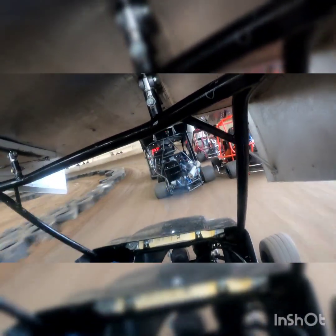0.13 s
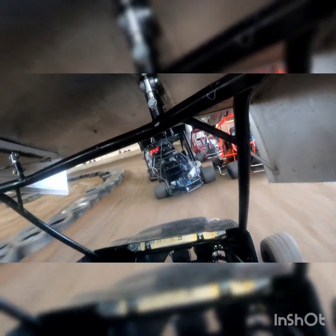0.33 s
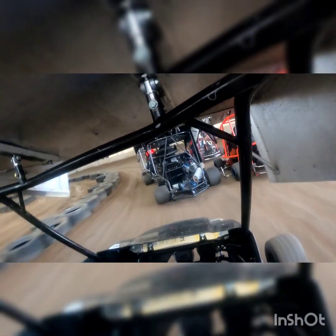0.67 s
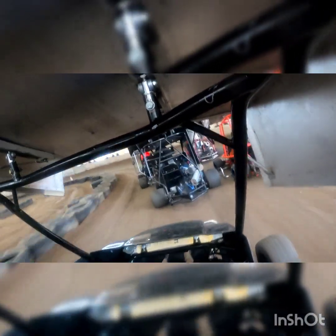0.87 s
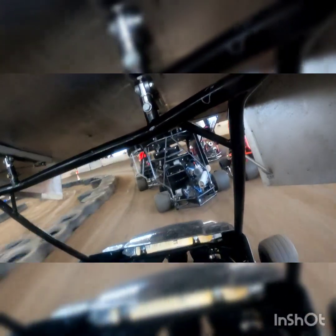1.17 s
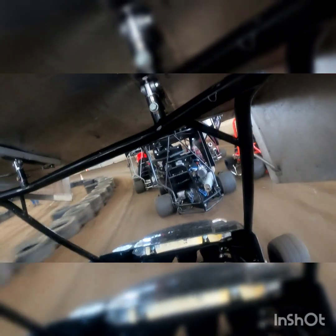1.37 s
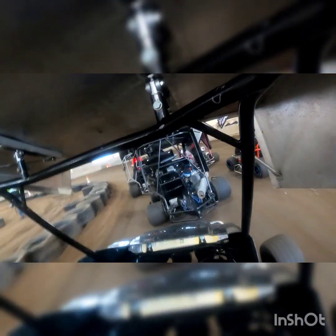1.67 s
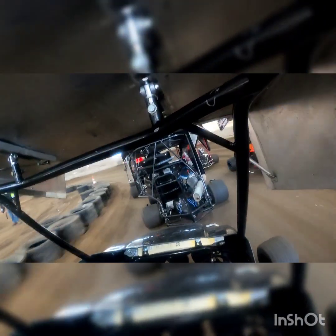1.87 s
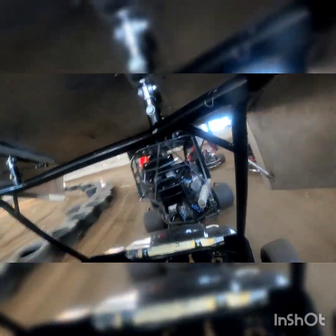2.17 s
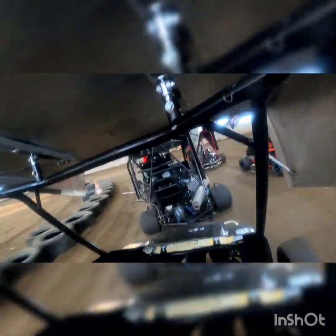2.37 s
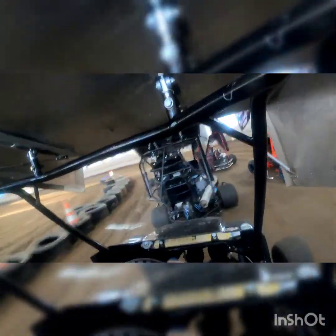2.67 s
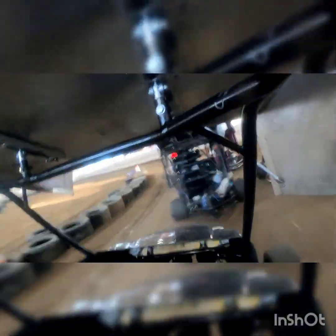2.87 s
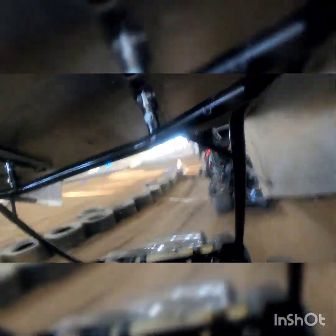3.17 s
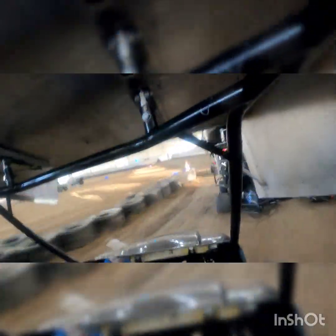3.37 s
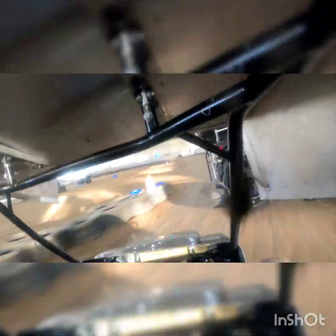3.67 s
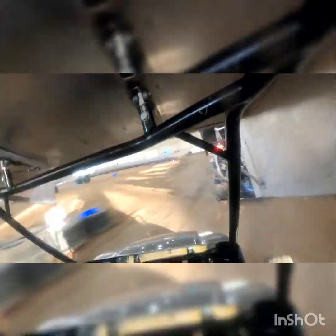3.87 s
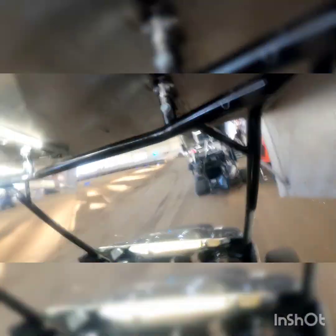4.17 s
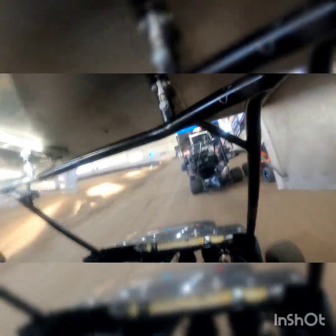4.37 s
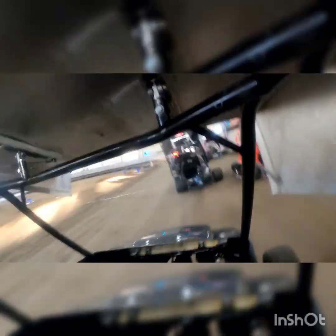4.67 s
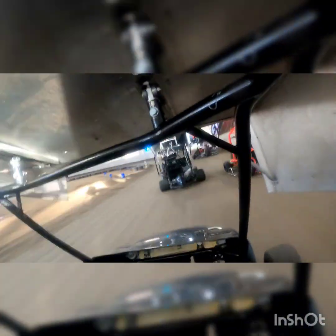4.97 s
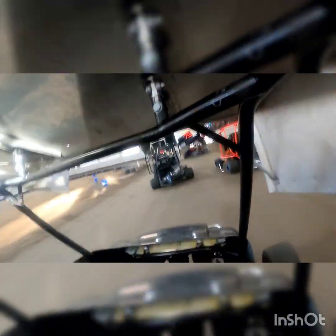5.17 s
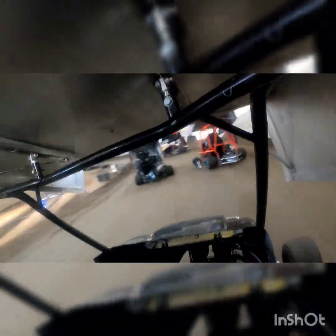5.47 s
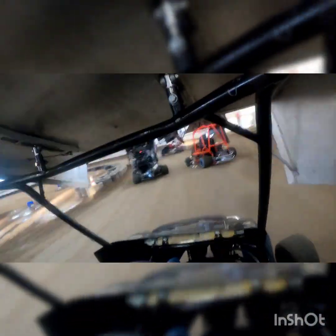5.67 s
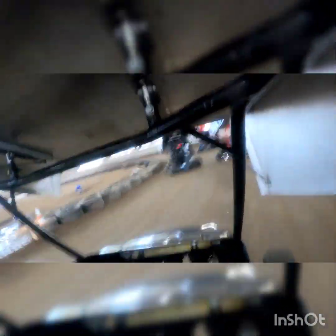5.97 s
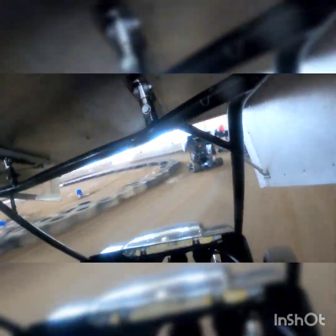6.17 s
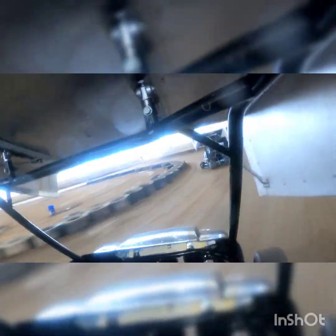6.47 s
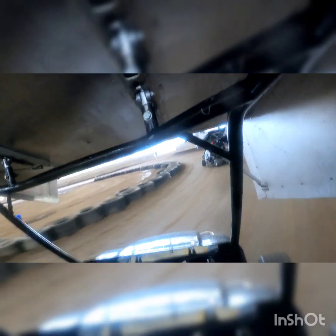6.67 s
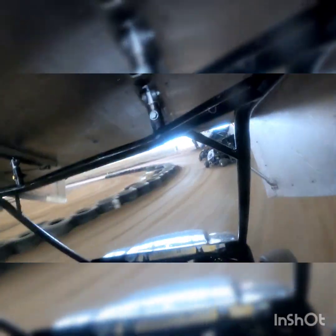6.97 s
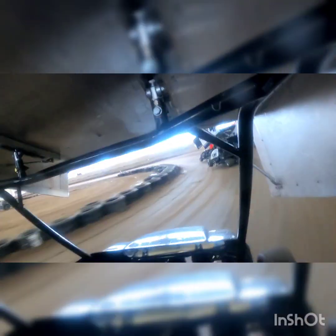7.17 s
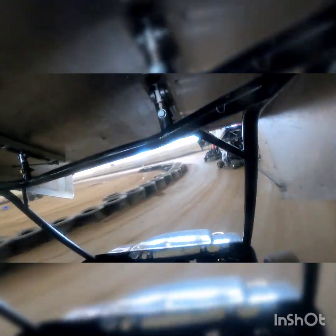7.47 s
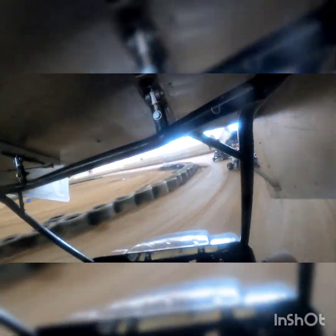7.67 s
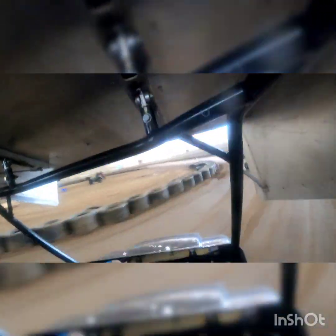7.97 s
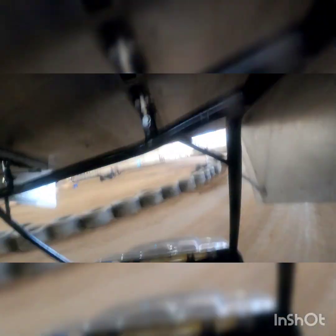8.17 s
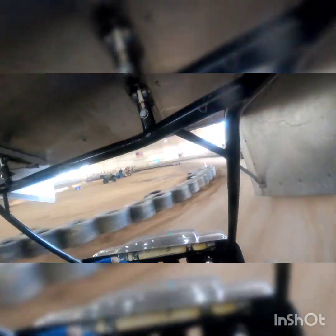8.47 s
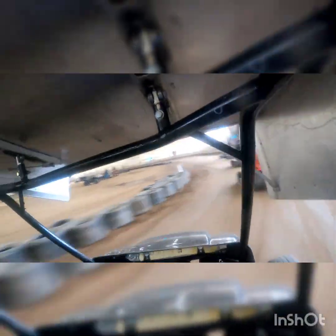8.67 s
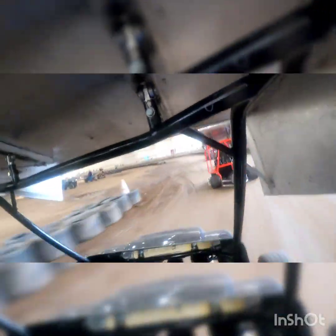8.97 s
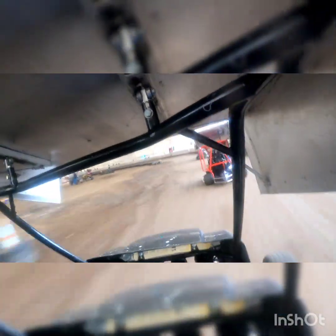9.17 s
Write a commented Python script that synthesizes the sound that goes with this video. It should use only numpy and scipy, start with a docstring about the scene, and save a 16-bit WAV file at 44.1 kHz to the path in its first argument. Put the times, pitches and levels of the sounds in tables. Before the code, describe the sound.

A small single-cylinder racing kart engine blips and drones low at close range, with rattling bodywork, drumming cage tubes and a pack roaring around it.

```python
"""On the cage of a racing kart on a dirt oval, heard through the two microphone ports of a camera bolted there.
The single-cylinder engine blips up and down as a stack of sine orders; ruts swell a sine bending note of the frame.
Resonated noise drums four cage notes; coloured noise and short rings make the rattle of panels and chain.
Brief noise bursts tick on the cage, and low noise is the roar of the pack. A limiter ducks the peaks."""
import sys
import numpy as np
from scipy import signal
from scipy.fft import rfft, irfft, next_fast_len
from scipy.io import wavfile
from scipy.ndimage import uniform_filter1d, minimum_filter1d, map_coordinates

SR = 44100
rng = np.random.default_rng(int(sys.argv[2]) if len(sys.argv) > 2 else 0)


def generate_wav(sig):
    """Save sig (samples, or channels by samples) to the path in sys.argv[1] as 16-bit PCM at SR."""
    pcm = np.round(np.clip(np.atleast_2d(sig).T, -1, 1) * 32767).astype(np.int16)
    wavfile.write(sys.argv[1], SR, pcm)


N = 410998
TIME = np.arange(N) / SR

# phase by which the left port leads the right: (frequency [Hz], phase [rad])
PORT_LEAD = [(50, .08), (150, 0), (205, -.22), (280, -.5), (520, -1.0), (1030, .5), (1460, -.6), (1980, .4),
             (2410, 1.5), (3450, .5), (4570, 3.8), (5600, 3.3), (6290, 3.3), (7000, 0), (7750, 1)]
# strength of the left port against the right: (frequency [Hz], difference [dB])
PORT_TILT = [(40, -2.2), (70, -1.2), (120, -1.5), (200, -.5), (280, -1.3), (400, -1.3)]


def amp(db):
    """Gain of a level in dB."""
    return 10 ** (np.asarray(db) / 20)


def unit(x):
    """Scaled to rms 1."""
    return x / np.sqrt(np.mean(x ** 2) + 1e-20)


def along(points, hz):
    """Values at hz, read from (Hz, value) points on a log frequency axis."""
    f, v = np.transpose(points)
    return np.interp(np.log(hz + 1), np.log(f + 1), v)


def curves(rows):
    """One value per sample for each column after the time."""
    s, *cols = np.transpose(rows)
    return [np.interp(TIME, s, c) for c in cols]


def wobble(rate):
    """A smooth random curve, rate knots a second."""
    knots = rng.standard_normal(int(N * rate / SR) + 4)
    return map_coordinates(knots, [TIME * rate])


def filtered(x, response):
    """x shaped by a complex response of frequency, padded so that its ring does not wrap round."""
    m = next_fast_len(N + SR // 4)
    hz = np.fft.rfftfreq(m, 1 / SR)
    return irfft(rfft(x, m) * response(hz), m)[..., :N]


def turns(hz):
    """Phase in radians of a running rate."""
    return 2 * np.pi * np.cumsum(hz) / SR


def tone(phase, db):
    """A sine of given rms level, from a random starting phase."""
    return np.sqrt(2) * amp(db) * np.sin(phase + rng.uniform(0, 2 * np.pi))


def ports(pair, left_db, right_db):
    """Two unrelated signals mixed, coloured and phase-shifted as the two microphone ports pick them up."""
    # likeness of the two ports: (frequency [Hz], coherence [0-1])
    likeness = [(60, .99), (200, .97), (290, .92), (370, .5), (500, .4), (800, .5), (1200, .93), (1430, .7),
                (1700, .93), (2400, .7), (3300, .7), (4600, .7), (6400, .4), (12000, .3)]

    def response(hz):
        # the ports share the first signal and take the second in opposite signs
        u = np.arccos(np.clip(along(likeness, hz), 0, 1)) / 2
        lead = np.exp(.5j * along(PORT_LEAD, hz))
        left, right = amp(left_db(hz)) * lead, amp(right_db(hz)) / lead
        return np.array([[left * np.cos(u), left * np.sin(u)],
                         [right * np.cos(u), -right * np.sin(u)]])
    return filtered(pair, response).sum(axis=1)


def engine():
    """Exhaust orders, sines at multiples of the crank rate with uneven firing; also returns the crank phase."""
    # engine in three stretches: (time [s], crank rate [Hz], then the mean level [dB] of each main order)
    stretches = [
        [(0.0, 56, -21, -21.5, -17.5, -30.5), (0.05, 60.55, -18, -30.5, -25.5, -28.5),
         (0.27, 70.2, -26, -34.5, -20.5, -20), (0.45, 79.9, -20.5, -27, -18, -23.5),
         (0.55, 69.5, -21.5, -34.5, -31, -12.5), (0.6, 63.8, -25.5, -18, -14.5, -27),
         (0.62, 60.5, -12.5, -31.5, -33, -23), (0.65, 60.5, -14, -25, -18.5, -25),
         (0.74, 57.45, -15, -28, -35, -22.5), (0.86, 63.3, -20, -31, -27.5, -36),
         (0.91, 67.37, -23, -25, -30.5, -18.5), (1.06, 87.9, -27.5, -27, -18, -28.5),
         (1.16, 80.7, -14, -25, -14, -30), (1.24, 67.9, -24.5, -31.5, -23.5, -24.5),
         (1.36, 61.4, -21, -37, -34, -24), (1.52, 59.2, -22.5, -30.5, -24, -34),
         (1.64, 61.4, -24, -33, -25.5, -26), (1.69, 61.53, -21.5, -20.5, -20.5, -32),
         (1.8, 78.36, -19, -30.5, -25.5, -22), (1.91, 87.7, -20, -33, -13, -39),
         (2.01, 74.2, -23.5, -34, -19.5, -24), (2.15, 71.04, -19, -32, -19, -18),
         (2.24, 60.93, -24, -22.5, -31.5, -26.5), (2.28, 60.46, -19, -38, -25, -35),
         (2.35, 63.9, -22, -30, -28, -20.5), (2.39, 67.3, -23.5, -39.5, -32, -23),
         (2.53, 107.5, -37.5, -30, -20.5, -31), (2.65, 101.9, -20.5, -28.5, -11, -35),
         (2.82, 87.15, -25, -29, -20, -34), (2.93, 91.2, -32, -39, -27, -25),
         (3.05, 89.7, -13.5, -32, -18, -28), (3.1, 95.8, -18, -29.5, -20.5, -27.5)],
        [(3.14, 112.1, -14, -29, -20.5, -33), (3.26, 129.9, -24.5, -32.5, -25.5, -42),
         (3.41, 102.3, -22, -15.5, -30, -26), (3.46, 106.7, -20.5, -38, -10, -38),
         (3.57, 125, -14.5, -28, -27.5, -43), (3.69, 110, -23.5, -22, -28.5, -37),
         (3.75, 107.4, -18, -31, -13.5, -35), (3.86, 132.8, -14.5, -25, -29.5, -38),
         (3.93, 155.8, -28, -19.5, -35, -32), (4.0, 116.3, -14.5, -31, -20.5, -49),
         (4.03, 115.1, -23.5, -17.5, -29, -34), (4.1, 118.7, -14, -27, -26, -36),
         (4.16, 124.9, -11, -42, -42, -45), (4.2, 126.4, -17.5, -19, -38, -35),
         (4.28, 102.4, -14.5, -25, -18, -39), (4.49, 125.5, -28, -20, -27, -38),
         (4.62, 114.9, -10.5, -30, -16.5, -49), (4.71, 125.8, -22, -22.5, -32, -42),
         (4.89, 115.7, -18, -29.5, -27, -29), (4.91, 115.4, -20.5, -23, -28, -49),
         (5.06, 145.2, -20.5, -18, -33.5, -32.5), (5.13, 104.1, -24, -29, -24, -39),
         (5.23, 105.9, -23, -25.5, -19.5, -37), (5.33, 96.35, -20.5, -31, -19, -24),
         (5.46, 106.6, -27.5, -23, -14, -38.5), (5.58, 86.5, -17, -30, -23.5, -24.5),
         (5.75, 59.54, -23, -27.5, -27.5, -25), (5.85, 86.6, -30.5, -30.5, -27.5, -33.5),
         (5.92, 104.5, -19, -23.5, -22, -37), (6.0, 122.8, -26, -22.5, -37, -35),
         (6.12, 100.6, -29, -27, -20, -32.5), (6.2, 115.4, -23.5, -21, -23.5, -40)],
        [(6.24, 115.3, -17.5, -16, -24, -35), (6.26, 118.7, -8, -30, -28, -41),
         (6.36, 102.9, -29, -30.5, -27, -33), (6.44, 104.5, -10, -23, -15.5, -34),
         (6.55, 113, -10.5, -28, -21.5, -21), (6.64, 100.6, -15, -26, -16.5, -36),
         (6.75, 86.7, -33, -32.5, -20.5, -29), (6.82, 97.9, -16.5, -25.5, -21, -23.5),
         (6.89, 120.9, -13.5, -23.5, -24.5, -46), (6.92, 129.8, -14, -15, -26, -29),
         (6.97, 126.5, -17.5, -26, -24.5, -38), (7.18, 102, -16.5, -27.5, -20, -33),
         (7.22, 99.1, -19.5, -27.5, -16.5, -42), (7.39, 98.9, -25, -27.5, -21.5, -31),
         (7.47, 89.7, -22.5, -26.5, -28.5, -31.5), (7.52, 88.5, -21.5, -33, -16.5, -22.5),
         (7.62, 105.1, -13.5, -23, -14.5, -30), (7.7, 117.1, -11, -30, -40.5, -36),
         (7.74, 123.7, -14, -30, -28, -39), (7.99, 127.9, -23, -28, -17.5, -44),
         (8.07, 145.6, -23, -24, -23.5, -37), (8.21, 116.5, -17, -14, -33, -26),
         (8.32, 119.6, -24.5, -32.5, -20.5, -39), (8.43, 140.4, -18.5, -27, -27, -41),
         (8.57, 152.3, -22.5, -33, -18.5, -39), (8.73, 142.4, -12.5, -35, -32.5, -40),
         (8.82, 152.5, -19.5, -26, -35, -38), (8.92, 131.1, -20, -19, -25, -41),
         (9.03, 156, -14.5, -42, -21, -30), (9.15, 134.5, -8.5, -26.5, -30.5, -42),
         (9.24, 141.1, -17.5, -22, -25, -34), (9.32, 154.2, -23.5, -23.5, -30, -34)],
    ]
    # main orders that have a level column: (multiple of the crank rate)
    main_orders = [1, 1.5, 2, 3]
    # weak exhaust orders: (multiple of the crank rate, mean level [dB])
    weak_orders = [(4, -43), (5, -43)]
    flutter_db, drift_db = 2.2, .5  # fast and slow wavering of each main order

    hz, *order_db = curves(np.concatenate(stretches))
    crank = turns(hz * (1 + .004 * wobble(14) + .006 * wobble(35)))
    exhaust = 0
    for k, db in zip(main_orders, order_db):
        exhaust = exhaust + tone(k * crank, db + flutter_db * wobble(20) + drift_db * wobble(5.9))
    for k, db in weak_orders:
        exhaust = exhaust + tone(k * crank, db + 4 * wobble(8))
    return exhaust, crank


def sway():
    """The frame's lightly damped bending note, a sine that ruts swell, hold and let die."""
    # swells of the frame note: (time it reaches full level [s], time held there [s], level [dB], pitch [Hz])
    swells = [(0.0, 0.13, -17.5, 42.5), (0.201, 0.39, -18, 41.82), (0.552, 1, -16.5, 42.65),
              (1.656, 0.085, -9.5, 44.65), (1.897, 0.17, -19.5, 46.6), (2.201, 0.34, -13.5, 45.15),
              (2.761, 0.19, -14, 41.1), (3.099, 0.41, -14, 38.38), (3.8, 0.11, -18, 40.79),
              (4.061, 0.33, -17.5, 41), (4.439, .5, -17.5, 40.84), (5.116, 0.037, -16.5, 41.98),
              (5.262, 0.037, -12.5, 42), (5.637, 0.47, -15, 40.96), (6.35, .08, -13.5, 45.05),
              (6.627, 0.42, -20, 42.9), (7.086, 0.14, -17, 41.02), (7.3, 0.19, -12.5, 40.5),
              (7.852, 0.079, -11.5, 43.74), (8.25, 0.11, -11, 40.6), (8.863, .05, -16, 46.5)]
    rise_db_per_s, fade_db_per_s = 250, 150.5  # how fast the note swells and dies

    full_at, hold, db, hz = np.transpose(swells)[..., None]
    rise_db = rise_db_per_s * (TIME - full_at)
    die_db = fade_db_per_s * (full_at + hold - TIME)
    shape_db = np.minimum(0, np.minimum(rise_db, die_db))
    # the pitch glides from the middle of one hold to the next
    pitch_hz = np.interp(TIME, (full_at + hold / 2)[:, 0], hz[:, 0]) + 1.213 * wobble(8)
    # the loudest swell rules at each moment
    level_db = (db + shape_db).max(axis=0) + 0.7 * wobble(25) + 2.0 * wobble(6.3)
    return tone(turns(pitch_hz), level_db)


def drum():
    """Four cage notes, resonances rung by noise as the frame shakes, each swelling at its own moments."""
    # drum notes of the tube cage: (centre [Hz], resonance width [Hz])
    modes = [(213.66, 13.2), (184.9, 12), (287.9, 27), (123, 11)]
    # mean level of each note before the shared drumming curve: (level [dB])
    mode_db = [-23, -25, -31.5, -29]
    # how hard the cage drums: (time [s], gain [dB])
    drumming = [(0, 1.5), (1.3, 2), (2.3, 4.5), (3.3, -2.5), (4.6, -3.5), (5.3, -1), (6.6, -2.5), (8, -3),
                (9.32, -2)]

    sound = 0
    for (c, w), db in zip(modes, mode_db):
        # two equal resonators in a row
        mode = lambda f: (1j * f * w / (c * c - f * f + 1j * f * w)) ** 2
        note = unit(filtered(rng.standard_normal(N), mode))
        sound = sound + amp(db + 1.3 * wobble(3)) * note
    return sound * amp(curves(drumming)[0])


def rattle(crank, swing):
    """Dense metal contacts, bunched by firings, by the frame's swing and at random, ringing the panels."""
    # shaking of the bodywork: (time [s], rattle level [dB], treble against it [dB], fizz against it [dB])
    shaking = [(0, -22.5, -2.5, -13), (.7, -22.5, -4, -13), (1.3, -22, -5, -14.5), (1.9, -22, -5, -12.5),
               (2.5, -22, -3, -12.5), (3, -22, -2.5, -13), (3.33, -21.5, 1, -13.5), (4, -22.5, 1.5, -12),
               (4.6, -21.5, -1, -13), (5, -22.5, -1, -14), (5.5, -21.5, -2.5, -15.5), (6, -22, -1.5, -15.5),
               (6.4, -22.5, 0, -14), (7.3, -22.5, -1, -13.5), (8, -22.5, 2.5, -11.5), (8.6, -21.5, 1, -13),
               (9.32, -21, -0.5, -13.5)]
    # mount and case colour: (frequency [Hz], relative density [dB per Hz])
    case_colour = [(200, -30), (330, -10), (700, -10), (1500, -9), (2300, -13), (2900, -23), (4000, -28),
                   (5600, -28), (6100, -36), (7800, -47), (8300, -61), (12500, -62), (14000, -72),
                   (15500, -85)]
    # panel resonances: (centre [Hz], half-width [Hz], left boost [dB], right boost [dB])
    panels = [(446, 55, 3, 11), (521, 44, 9, -3), (627, 34, -4.5, 1), (746, 60, 1.5, 5), (1084, 68, 2, 1.5),
              (1188, 45, 1.5, 8.5), (1330, 130, -3.5, -3.5), (1608, 64, 1, 3.5), (1760, 110, 0.5, 3),
              (2210, 600, -3, 0.5), (2497, 37, -1.5, 6), (2813, 64, -8.5, -7.5), (3070, 140, 0.5, 6.5),
              (3780, 110, -4.5, 2), (4370, 360, -2, 6), (4695, 320, 7.5, 1), (5380, 260, 2.5, -15.5),
              (8400, 1200, -9.5, 5), (10200, 1100, 5.5, 3)]
    # the rattle dips for an instant: (time [s], half-length to 1/e of the depth [s], depth [dB])
    dips = [(5.813, .006, -5), (5.987, .0015, -6), (6.022, .0015, -6), (4.263, .002, -6), (4.298, .002, -7),
            (4.751, .002, -7), (5.973, .002, -9), (6.0, .002, -8), (6.027, .002, -6), (6.037, .0025, -11),
            (6.053, .002, -8), (6.062, .003, -13), (4.145, .003, -6), (4.25, .003, -6)]
    firing_db, swing_db = .9, 1.6  # how much each firing (rms) and each swing (at most) bunch the rattle

    body_db, bright_db, fizz_db = curves(shaking)
    low_db = -6.5 - 0.6 * bright_db  # the low rattle thins as the treble grows
    pan_db = 1.4 - 0.24 * bright_db  # the treble draws the rattle to the right

    # loose parts strike at both ends of the swing
    swing_power = unit(swing) ** 2
    ends = swing_power - uniform_filter1d(swing_power, size=SR // 40)
    firings = unit(np.exp(1.5 * np.cos(crank)) - np.i0(1.5))  # one peak a crank turn
    bunch_db = firing_db * firings + swing_db * np.tanh(ends / 2)
    random_db = 0.66 * wobble(45) + 1.02 * wobble(170)
    contacts = amp(bunch_db + random_db) * rng.standard_normal((2, N))
    contacts[0] += amp(-16.5) * strands(crank, count=1100)

    def side_db(column):
        """Case colour plus the panel peaks of one side."""
        peaks = lambda hz: sum(p[column] / (1 + ((hz - p[0]) / p[1]) ** 2) for p in panels)
        return lambda hz: along(case_colour, hz) + peaks(hz)

    sound = ports(patchy(contacts), side_db(2), side_db(3))
    above = lambda edge_hz: filtered(sound, lambda hz: 1 / (1 + (edge_hz / (hz + 1)) ** 6))
    # four bands, split at 680, 1500 and 3800 Hz
    cuts = [sound, above(680), above(1500), above(3800), 0]
    low, body, bright, fizz = (unit(a - b) for a, b in zip(cuts, cuts[1:]))

    # jolts shake the light parts more than the heavy ones
    jolt = 0.19 * wobble(8.2) + .7 * wobble(22)
    parts = amp(low_db + 0.66 * wobble(14)) * low
    parts = parts + amp(0.8 + 0.14 * jolt) * body
    parts = parts + amp(bright_db + 0.77 * jolt + 0.58 * wobble(10)) * bright
    parts = parts + amp(fizz_db + 0.47 * jolt + 1.1 * wobble(13)) * fizz
    dip_db = sum(db * np.exp(-((TIME - s) / length) ** 4) for s, length, db in dips)
    return amp(body_db + dip_db + np.array([[.5], [-.5]]) * pan_db) * parts


def strands(crank, count):
    """Panels caught ringing for 41 to 89 ms, at pitches near their resonances, bending with the revs."""
    spread_hz = 110  # full width of the pitch scatter
    follows = .15  # phase bend per unit of engine glide; the pitch bends twice as far

    draw, t = rng.random((count, 5)), np.arange(SR // 8) / SR
    panel_hz = np.array([790, 1070, 1180, 1590, 1750, 450, 540, 2500, 3100, 4720, 4950, 7170])
    hz = panel_hz[(draw[:, 0] * 12).astype(int)] + spread_hz * (draw[:, 1] - .5)
    start = (draw[:, 4:5] * N).astype(int)
    log_revs = np.log(uniform_filter1d(np.gradient(crank), size=SR // 15))
    glide = np.gradient(log_revs)[start] * SR  # relative change of the revs a second
    bend = (0.29 * (draw[:, 2:3] - .5) + follows * glide) * t
    life_s = 0.041 + 0.048 * draw[:, 3:4]
    swell = np.sin(np.pi * np.clip(t / life_s, 0, 1)) ** 2
    rings = np.sin(2 * np.pi * hz[:, None] * t * (1 + bend)) * swell
    # lay every ring down at its own start
    at = start + np.arange(len(t))
    return unit(np.bincount(at.ravel(), rings.ravel(), N + len(t))[:N])


def patchy(x):
    """Each region of the spectrum swells at its own moments, by a smoothed random field of gains."""
    # how strongly each region swells: (frequency [Hz], rms depth [dB])
    patch_depth = [(400, 0.8), (1500, 0.4), (3000, 1.48), (8000, 0.9)]

    hz, _, z = signal.stft(x, SR, nperseg=512)
    field = rng.standard_normal(z.shape[1:])
    for axis in (0, 1):
        field = uniform_filter1d(field, size=6, axis=axis)
    gain = amp(along(patch_depth, hz)[:, None] * unit(field))
    return signal.istft(z * gain, nperseg=512)[1][:, :N]


def ticks():
    """Loose parts tick on the cage: each is a few milliseconds of bright noise; many faint ones fall at random."""
    # clear ticks: (time [s], starting level before the colour [dB])
    clear_ticks = [(0.7921, -21), (1.396, -24), (1.7168, -23), (4.1025, -13), (4.293, -19), (4.5605, -14),
                   (4.6245, -14), (4.757, -21), (5.9445, -15), (5.99, -18)]
    # colour of a tick: (frequency [Hz], gain [dB])
    tick_colour = [(500, -14), (1200, -3), (3000, 0), (5500, -1), (7800, -13), (8400, -34), (13500, -35),
                   (15500, -46)]
    t60_s = .009  # time to fall by 60 dB
    faint_db, faint_spread_db = -33, 6  # lowest level of the faint ticks, and their range above it

    sound, t = np.zeros((2, N + SR)), np.arange(SR // 50) / SR
    faint_ticks = rng.random((150, 2)) * [N / SR, faint_spread_db] + [0, faint_db]
    for s, db in [*clear_ticks, *faint_ticks]:
        # partly the same noise at both ports
        noise = rng.standard_normal(len(t)) + .6 * rng.standard_normal((2, len(t)))
        sound[:, round(s * SR):][:, :len(t)] += amp(db - 60 * t / t60_s) * noise
    return filtered(sound[:, :N], lambda hz: amp(along(tick_colour, hz)))


def pack():
    """The low blur of other engines and tyres on dirt: coloured noise whose deepest part has its own level."""
    # karts around: (time [s], roar level [dB], gain of its deepest part [dB])
    pack_level = [(0, -13.5, 0.5), (1, -15.5, -4.5), (2.4, -17.5, 0.5), (3.4, -17.5, 3), (4.3, -17, 1.5),
                  (5.3, -16, 2), (5.9, -17.5, 3), (6.5, -17, 0), (7.4, -18, -1), (7.8, -19, 0.5),
                  (8.7, -16, 1), (9.32, -17, -3.5)]
    # colour of the roar: (frequency [Hz], relative density [dB per Hz])
    roar_colour = [(13, -31), (22, -3.5), (48, 0.5), (80, -5), (195, 0), (276, -2.5), (362, -13.5),
                   (420, -16), (550, -42), (920, -120)]
    deep_hz = 85  # upper edge of the deepest part

    level_db, deep_db = curves(pack_level)
    half_tilt = lambda hz: along(PORT_TILT, hz) / 2
    left_db = lambda hz: along(roar_colour, hz) + half_tilt(hz)
    right_db = lambda hz: along(roar_colour, hz) - half_tilt(hz)
    roar = unit(ports(rng.standard_normal((2, N)), left_db, right_db))
    deep = filtered(roar, lambda hz: 1 / (1 + (hz / deep_hz) ** 6))
    return amp(level_db + 1.4 * wobble(8)) * (roar - deep + amp(deep_db) * deep)


def scene():
    """The kart's own low notes reach the two ports a little apart in strength and phase; the rest joins them."""
    exhaust, crank = engine()
    swing = sway()
    apart = lambda hz: amp(along(PORT_TILT, hz) / 2) * np.exp(.5j * along(PORT_LEAD, hz))
    both_ports = lambda hz: np.array([apart(hz), 1 / apart(hz)])
    low = filtered(exhaust + swing + drum(), both_ports)
    return low + rattle(crank, swing) + ticks() + pack()


def record(dry):
    """A fast limiter ducks both channels together around peaks; the deepest bass and the top are cut."""
    top_hz, fade_out_s = 15100, .004

    loud = dry * amp(-1.0)
    need = np.minimum(1, .8 / (np.abs(loud).max(axis=0) + 1e-9))
    # the shifted window holds the gain down longer after a peak than before it
    gain = uniform_filter1d(minimum_filter1d(need, size=301, origin=90), size=151)
    # what slips past the limiter is rounded off near full scale
    held = loud * gain / (1 + np.abs(loud * gain / .95) ** 8) ** (1 / 8)
    held = held * np.clip((TIME[-1] - TIME) / fade_out_s, 0, 1)
    return filtered(held, lambda hz: (hz < top_hz) / (1 + (25 / (hz + 1)) ** 3))


dry = scene()
out = record(dry)
generate_wav(out)
```